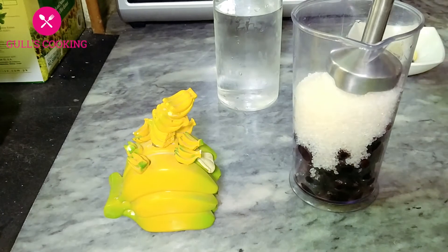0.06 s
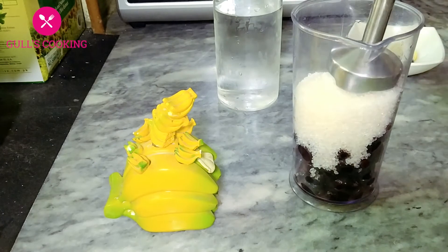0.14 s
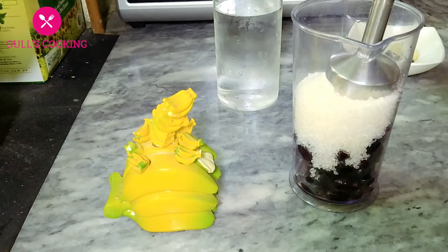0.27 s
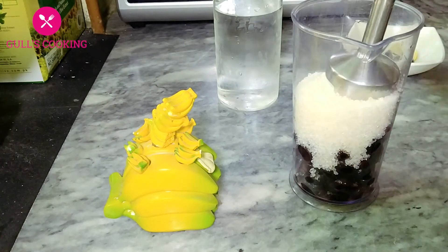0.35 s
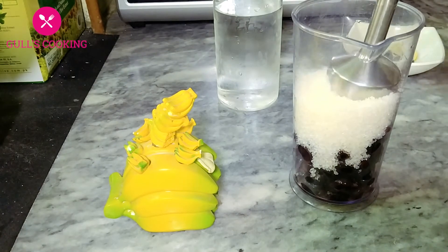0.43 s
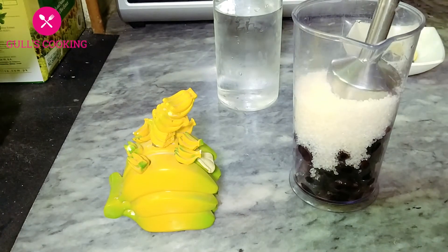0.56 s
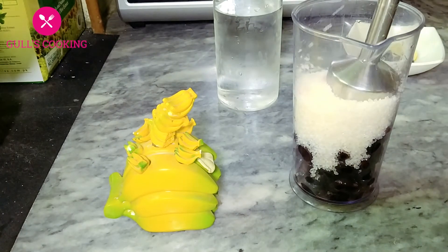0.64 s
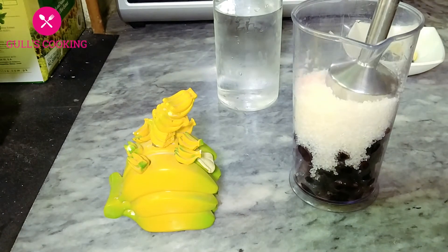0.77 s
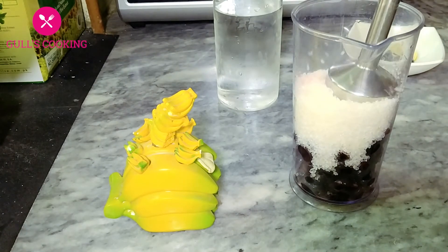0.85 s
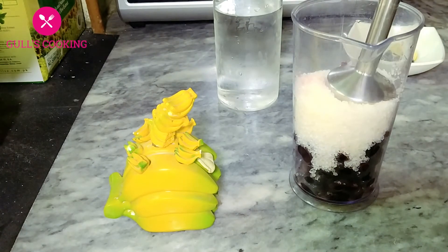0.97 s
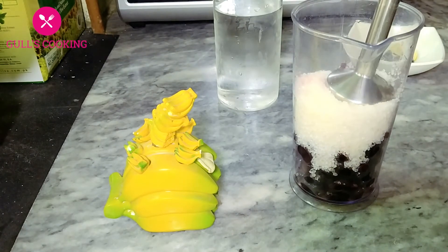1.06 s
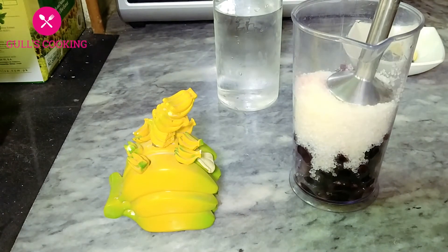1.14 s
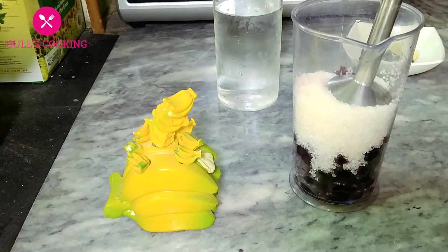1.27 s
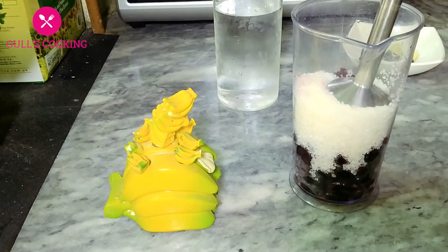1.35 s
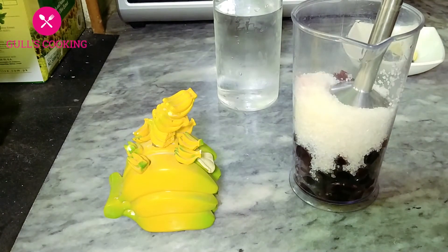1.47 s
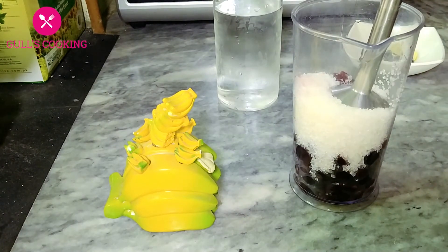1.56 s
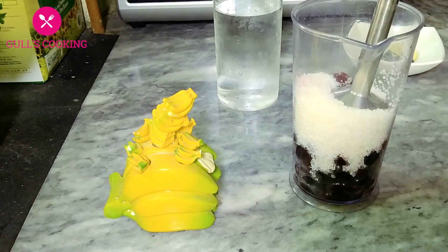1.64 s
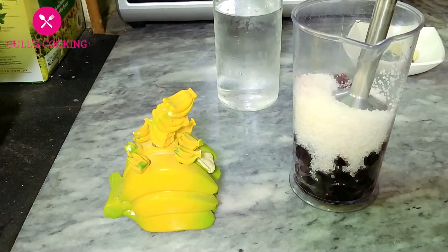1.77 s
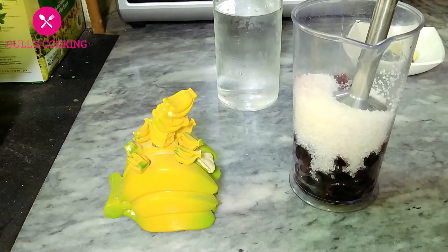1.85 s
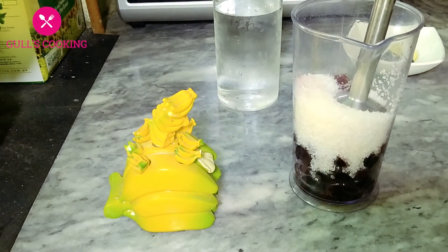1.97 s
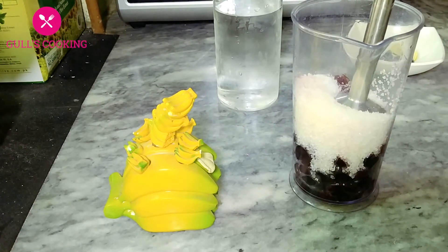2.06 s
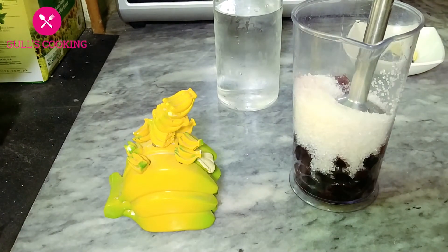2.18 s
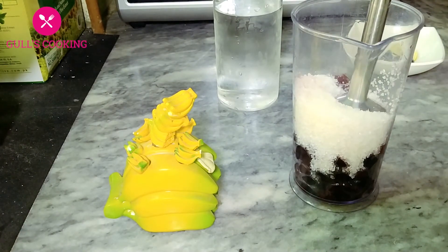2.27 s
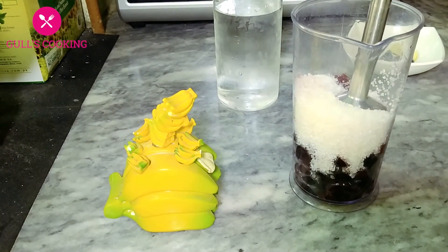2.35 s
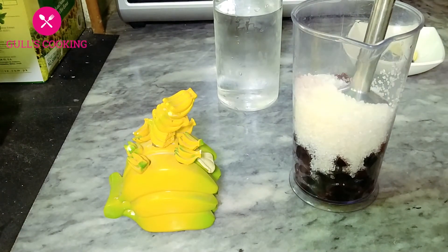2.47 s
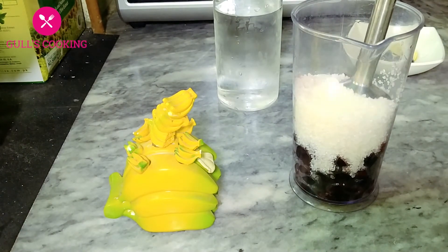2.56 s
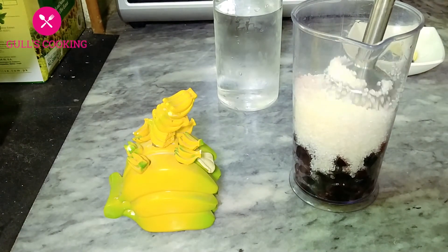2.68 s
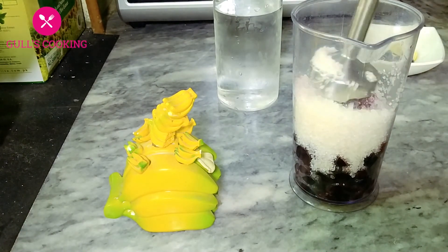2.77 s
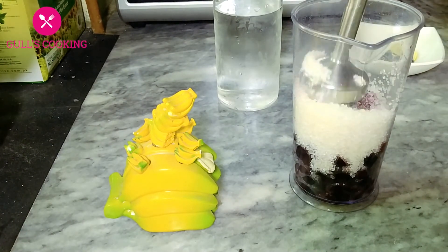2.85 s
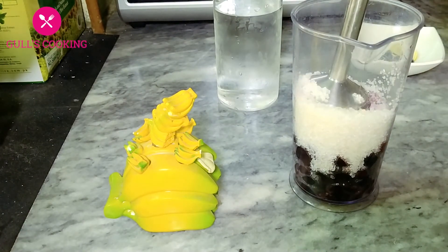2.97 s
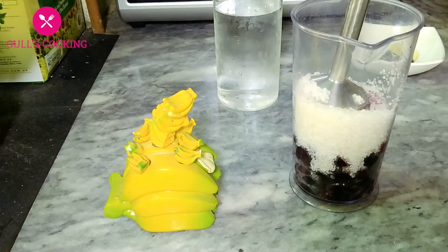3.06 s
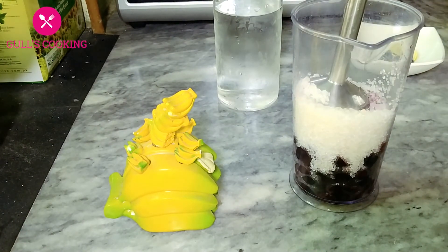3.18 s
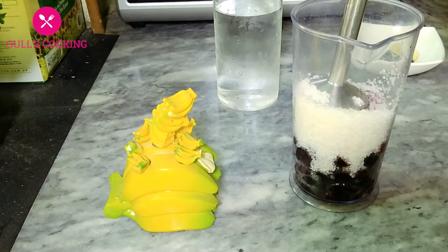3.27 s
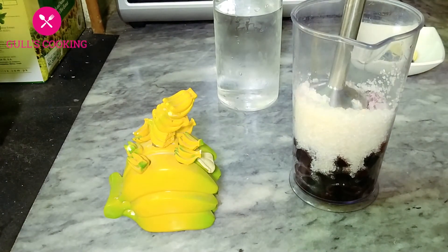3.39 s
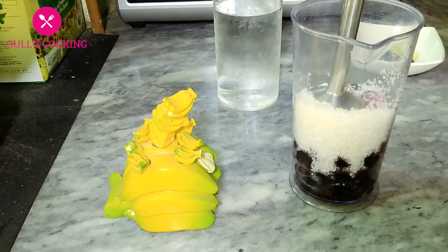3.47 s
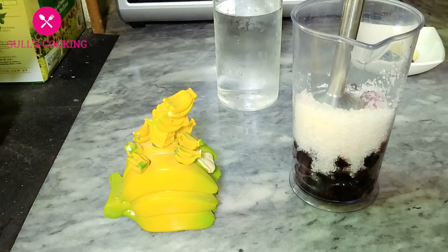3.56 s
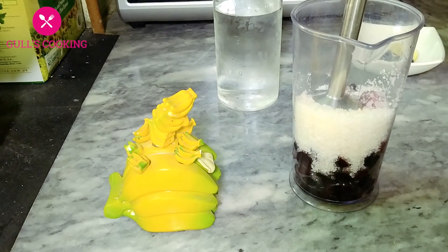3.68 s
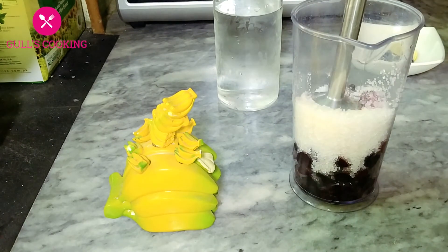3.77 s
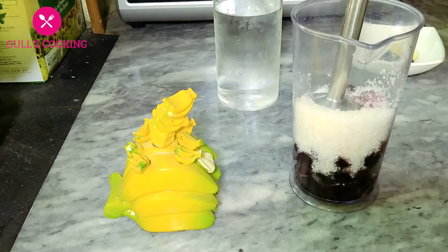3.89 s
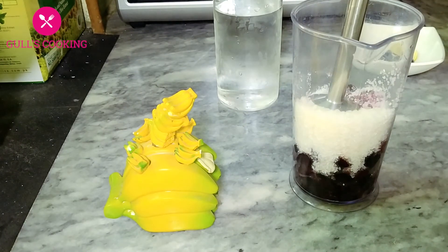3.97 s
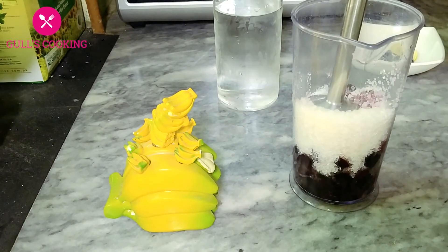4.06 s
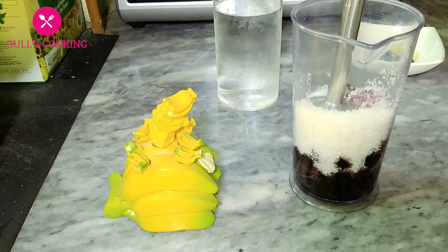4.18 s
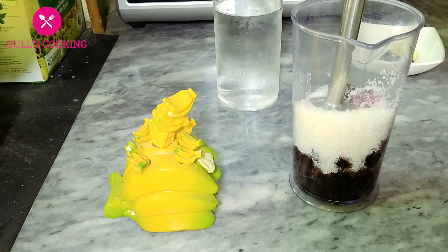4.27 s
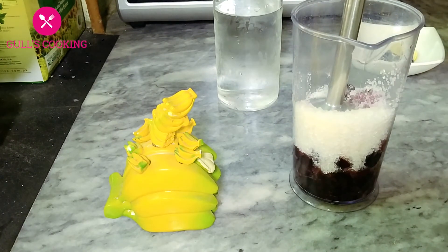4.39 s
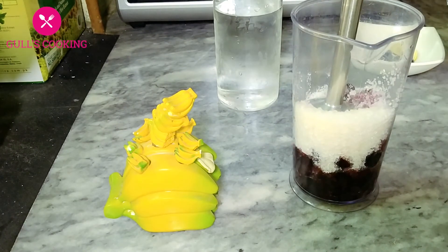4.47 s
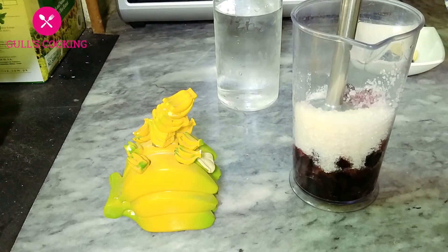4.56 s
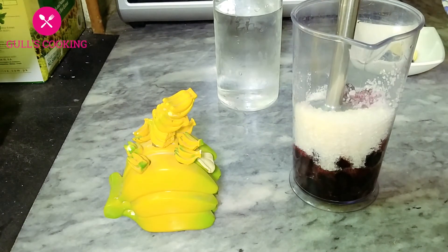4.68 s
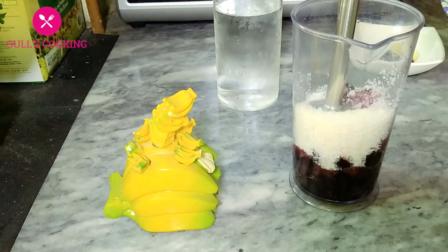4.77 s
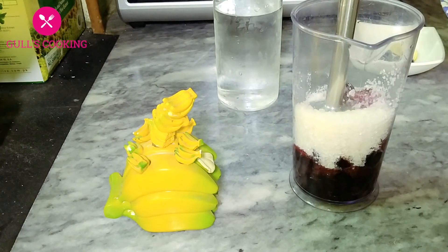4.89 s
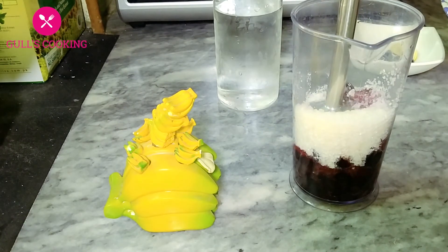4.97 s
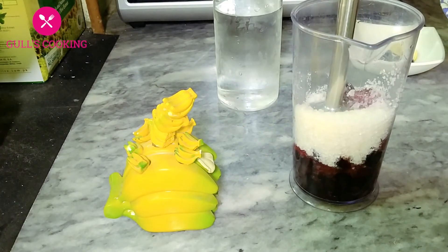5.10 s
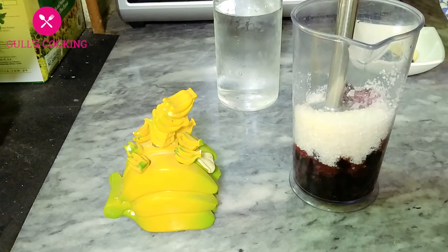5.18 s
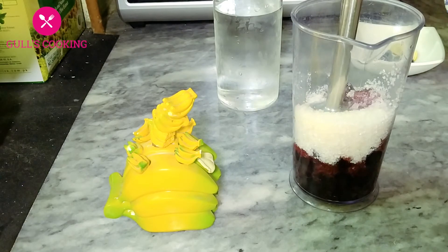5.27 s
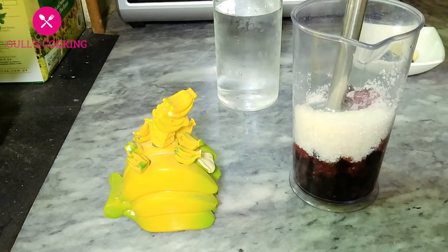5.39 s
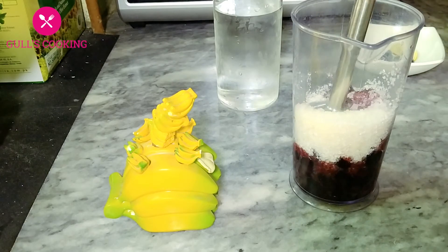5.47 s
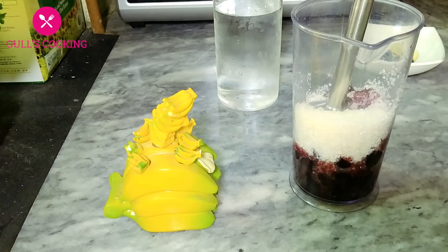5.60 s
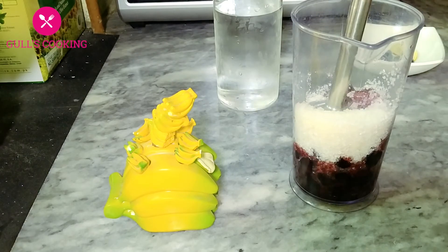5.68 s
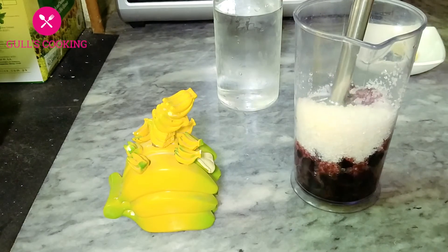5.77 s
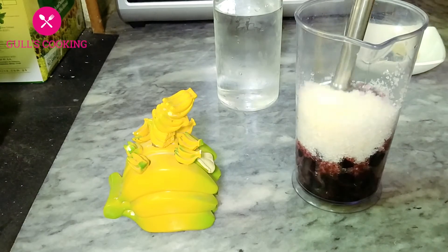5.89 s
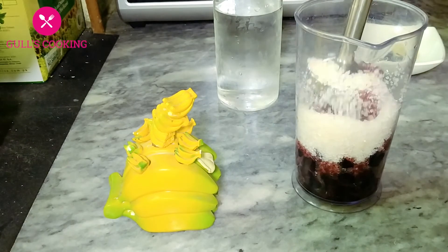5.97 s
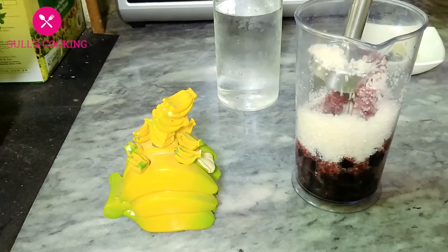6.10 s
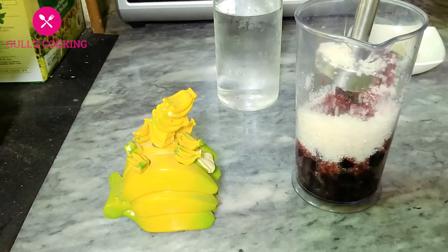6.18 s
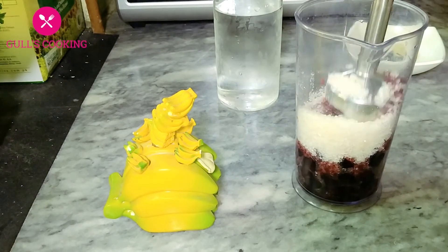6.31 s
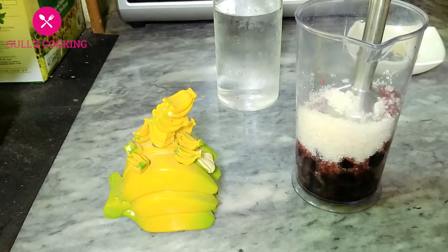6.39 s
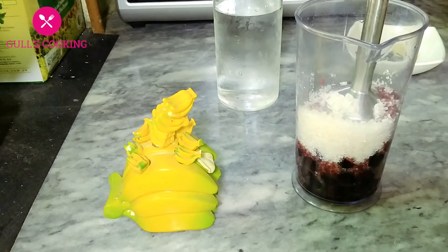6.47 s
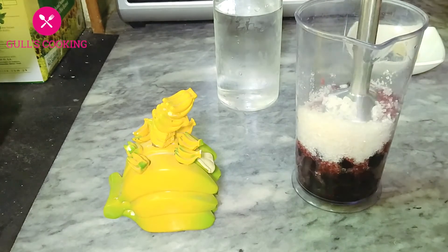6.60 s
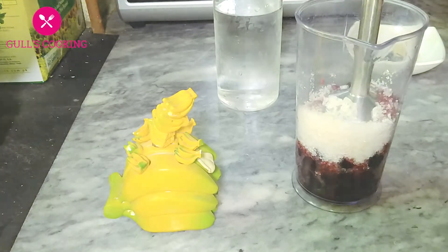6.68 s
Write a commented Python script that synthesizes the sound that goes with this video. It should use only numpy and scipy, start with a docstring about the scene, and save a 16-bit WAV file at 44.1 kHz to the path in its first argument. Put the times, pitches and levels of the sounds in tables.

```python
"""Immersion blender in a beaker of berries

In a small hard kitchen, heard as from a close microphone, a hand blender runs in two bursts in a plastic
beaker of berries and sugar on a stone counter. Shaft-speed tones hum and whine over random grains of sugar
and pulp, coloured by the beaker; in the first burst dry crystals also ring the steel bell until it is wet.
Around the bursts the still bell crunches through sugar and taps the beaker; clumps drop after the second."""
import sys
import numpy as np
from scipy import signal
from scipy.fft import rfft, irfft, next_fast_len
from scipy.io import wavfile

SR = 44100
rng = np.random.default_rng(int(sys.argv[2]) if len(sys.argv) > 2 else 0)


def pcm_store(signal):
    """Save signal as 16-bit PCM."""
    levels = np.round(np.clip(np.atleast_2d(signal), -1, 1) * 32767)
    wavfile.write(sys.argv[1], SR, levels.astype(np.int16).T)


N = 297234   # samples
TIME = np.arange(N) / SR   # s
FFT_SIZE = next_fast_len(N, True)
BINS = np.maximum(np.fft.rfftfreq(FFT_SIZE, 1 / SR), 1)   # Hz


def from_db(db):
    """Decibels to gain."""
    return 10 ** (np.asarray(db) / 20)


def rms(x):
    """Root mean square."""
    return np.sqrt(np.mean(x ** 2) + 1e-20)


def at_hz(points, hz):
    """A spectrum in dB read on a log-frequency axis."""
    points = np.array(points)
    return np.interp(np.log(hz), np.log(points[:, 0]), points[:, 1])


def drift(rate):
    """Smooth random curve of rms near 1; a higher rate wanders faster."""
    r = np.exp(-80 * np.pi * rate / SR)
    noise = rng.standard_normal(N // 40 + 2002)
    slow = signal.lfilter([1], [1, -2 * r, r * r], noise)[2000:]   # one point per 40 samples
    return np.interp(np.arange(N) / 40, np.arange(len(slow)), slow / rms(slow))


def ramp(start, length_s):
    """Goes evenly from 0 to 1."""
    return np.clip((TIME - start) / length_s, 0, 1)


def swell(start, end, rise_s, fall_s):
    """Gain that rises to 1 at start, holds, and falls after end; slopes are times for 20 dB."""
    below = np.maximum(start - TIME, 0) / rise_s + np.maximum(TIME - end, 0) / fall_s
    return from_db(-20 * np.minimum(below, 8))


def band(low_hz, high_hz):
    """Gain of a steep band-pass; neighbouring bands add up flat."""
    return ((1 + (low_hz / BINS) ** 12) * (1 + (BINS / high_hz) ** 12)) ** -.5


def coloured(x, response):
    """A sound shaped by a gain per frequency; rms 1."""
    y = irfft(rfft(x, FFT_SIZE) * response, FFT_SIZE)[:N]
    return y / rms(y)


def resonate(x, modes):
    """Parallel two-pole resonances with alternating signs."""
    out = 0
    for k, (hz, width, db) in enumerate(modes):
        r = np.exp(-np.pi * width / SR)
        zeros = np.array([1, 0, -1]) * (1 - r * r) / 2
        poles = [1, -2 * r * np.cos(2 * np.pi * hz / SR), r * r]
        out = out + (-1) ** k * from_db(db) * signal.lfilter(zeros, poles, x)
    return out


def grains(per_s, spread_db):
    """Tiny impacts at random moments, a few much harder than the rest."""
    sizes = from_db(spread_db * np.minimum(rng.exponential(1, N), 5))
    return (rng.random(N) < per_s / SR) * sizes * rng.choice([-1, 1], N)


def burst(s, t60):
    """A rough contact: noise that starts at s and dies away by 60 dB in t60 seconds."""
    age = np.clip(TIME - s, 0, 1)
    return rng.standard_normal(N) * (TIME >= s) * from_db(-60 * np.minimum(age / t60, 3))


def tone(angle, order, rough):
    """One multiple of an angle as a sine; random drifts shake its phase and its strength."""
    phase = order * angle + rough * drift(15)
    return np.sqrt(2) * np.sin(phase) * np.exp(rough * drift(24.5) / 2)


def kitchen(x, wet_db, t60):
    """Adds the short diffuse ring of a small hard room."""
    t = TIME[:SR // 2]
    tail = rng.standard_normal(len(t)) * from_db(-60 * t / t60) * (t > .004)
    wet = signal.fftconvolve(x, tail / np.linalg.norm(tail))[:N]
    return (x + from_db(wet_db) * wet) / np.hypot(1, from_db(wet_db))


# The button held under the hand. Each row: on in seconds, off in seconds, attack in seconds, rundown in
# dB per second, blade tone in dB, its octave in dB, the octave's offset at the start in dB, pulp churn in dB,
# sugar grind in dB, change of the grind at the first bite in dB, crystal hiss in dB, its growth in dB per second.
BURSTS = [(0.442, 2.295, 0.011, 131, -27.5, -35, 4, -19, -16, -4.5, -33, 2),
          (3.439, 5.5326, 0.046, 186, -29, -30.5, -16.5, -16.5, -19, 5.5, -32, 2)]


def running(on, off, attack_s, rundown_db_per_s):
    """Gain of one burst: a quick attack, a hold, and a rundown once the button is let go."""
    return ramp(on, attack_s) ** 1.14 * from_db(-rundown_db_per_s * np.clip(TIME - off, 0, 1))


# Colour of the filled beaker close by. Each row: frequency in Hz, relative level in dB.
BEAKER = [(30, -51), (100, -20.5), (160, -14.5), (230, -14.5), (400, -7), (750, 5.5), (1250, -4), (2200, 0),
          (3200, -8), (5000, -24.5), (7200, -25), (9800, -26), (12000, -32.5), (15500, -35)]
# Resonances that stand out of it. Each row: frequency in Hz, width in Hz, lift in dB.
BEAKER_MODES = [(520, 100, 0.5), (845, 75, 7.5), (936, 14, 5.5), (1093, 26, 5), (1696, 63, 5.5),
                (1821, 56, 4.5), (2203, 350, 3), (8690, 1900, 12.5)]


def beaker(hz):
    """How strongly the filled beaker radiates each frequency: a broad colour plus resonant peaks."""
    lift_db = sum(db / (1 + (2 * (hz - centre) / width) ** 2) for centre, width, db in BEAKER_MODES)
    return from_db(at_hz(BEAKER, hz) + lift_db)


# Shaft speed in the first and in the second burst. Each row: time in seconds, turns per second.
SPEED_FIRST = [(0.56, 82), (0.61, 106), (0.68, 117.5), (0.894, 119.2), (1.322, 104.7), (1.616, 81.7),
               (1.782, 76.1), (1.858, 86.3), (2.36, 83)]
SPEED_SECOND = [(3.47, 138.4), (3.5, 144.6), (3.77, 141.9), (3.8, 133.9), (4.06, 121.3), (4.41, 123.7),
                (4.69, 134.1), (5.36, 149.9), (5.6, 146.2)]


def shaft_speed():
    """Turns per second: the motor sags and recovers along the tables, and lumps jog the shaft a little."""
    rows = np.array(list(SPEED_FIRST) + list(SPEED_SECOND))
    return np.interp(TIME, rows[:, 0], rows[:, 1]) * (1 + 0.00306 * drift(30.5))


SINK_S, SOAK_S = 0.91, 0.12   # the blade starts to sink into the berries; the powder is wet this much later
CHURN_BUILD_S, DRY_CHURN_DB = 0.88, -14.5   # the churn builds up from this offset in dry sugar
FREE_TURNS_PER_S = 139.5   # above this speed the blade spins in a hollow
FREE_LOSS_DB = 0.49   # churn lost per extra turn per second
GRIND_SETTLE_S = 0.49   # time constant with which the first bite wears off
HISS_RUNDOWN = 1.18   # the hiss dies this much faster than the churn
# Dry sugar caves in on the blade and hisses. Each row: start in seconds, end in seconds, extra hiss in dB.
CAVE_INS = [(0.45, 0.6, 3), (1.21, 1.28, 6), (1.71, 1.8, 3), (3.45, 3.53, 8.5)]
CAVE_IN_RISE_S, CAVE_IN_FALL_S = 0.059, 0.33   # time for 20 dB


def chopping(angle, speed, body):
    """Passing wings throw a swarm of crystals and pulp at the wall, stronger and weaker through each turn."""
    bite = from_db(0.32 * np.cos(2 * angle) + 0.85 * np.cos(angle) + 0.85 * drift(50))
    swarm = kitchen(bite * grains(per_s=16000, spread_db=1.5), wet_db=-8.5, t60=0.37)

    powder = coloured(swarm, body ** 0.57 * band(210, 1000))   # loose sugar hardly excites the resonances
    pulp = coloured(swarm, body * band(15, 1290))
    soaked = ramp(SINK_S, SOAK_S)
    build_db = DRY_CHURN_DB * (1 - ramp(SINK_S, CHURN_BUILD_S))
    loss_db = FREE_LOSS_DB * np.maximum(speed - FREE_TURNS_PER_S, 0)
    churn = from_db(build_db - loss_db) * ((1 - soaked) * powder + soaked * pulp)

    grind = coloured(swarm, body * band(1260, 3700))

    fresh_sugar = 1
    for start, end, db in CAVE_INS:
        fresh_sugar = fresh_sugar + (from_db(db) - 1) * swell(start, end, CAVE_IN_RISE_S, CAVE_IN_FALL_S)
    hiss = fresh_sugar * coloured(swarm, body * band(4120, 18000))

    out = 0
    for on, off, attack_s, rundown, _, _, _, churn_db, grind_db, first_bite_db, hiss_db, hiss_growth in BURSTS:
        age = np.clip(TIME - on, 0, off - on)
        grind_gain = from_db(grind_db + first_bite_db * np.exp(-age / GRIND_SETTLE_S))
        hiss_gain = from_db(hiss_db + hiss_growth * age)
        out = out + running(on, off, attack_s, rundown) * (from_db(churn_db) * churn + grind_gain * grind)
        out = out + running(on, off, attack_s, HISS_RUNDOWN * rundown) * hiss_gain * hiss
    return out


# The blade tone grows with speed until the wings run full; the wobble and the octave keep growing.
FULL_TURNS_PER_S, HUM_DB_PER_OCTAVE = 115.5, 39   # growth per doubling of speed
WOBBLE_DB = -61   # at full speed
OCTAVE_BUILD_S = 0.91   # the octave leaves its start offset over this time


def hum(angle, speed):
    """The shaft wobbles once a turn; the two blade wings push the pulp twice a turn, with an octave above."""
    speed_db = HUM_DB_PER_OCTAVE * np.log2(speed / FULL_TURNS_PER_S)
    wobble = from_db(WOBBLE_DB + speed_db) * tone(angle, order=1, rough=0.38)
    blade = from_db(np.minimum(speed_db, 0)) * tone(angle, order=2, rough=0.39)
    octave = from_db(speed_db) * tone(angle, order=4, rough=0.45)
    out = 0
    for on, off, attack_s, rundown, blade_db, octave_db, start_db, *_ in BURSTS:
        build_db = start_db * (1 - ramp(on, OCTAVE_BUILD_S))
        tones = wobble + from_db(blade_db) * blade + from_db(octave_db + build_db) * octave
        out = out + running(on, off, attack_s, rundown) ** 2 * tones   # dies faster than the chopping
    return out


# Multiples of the shaft speed that sing out.
# Each row: start in seconds, end in seconds, multiple of the shaft speed, level in dB.
SWELLS = [(0.66, 0.735, 24, -25.5), (0.813, 0.99, 6, -29), (1.28, 1.33, 8, -26.5), (1.5, 1.52, 12, -19.5),
          (1.65, 1.69, 12, -16), (2.0, 2.28, 8, -22), (1.95, 2.247, 2, -47.5), (3.618, 3.68, 6, -19),
          (3.641, 3.713, 1, -51), (4.06, 4.12, 4, -25.5), (4.442, 4.499, 6, -20.5), (4.94, 4.99, 6, -19.5),
          (5.036, 5.432, 1, -28.5)]
SWELL_RISE_S, SWELL_FALL_S = 0.18, 0.13   # time for 20 dB
SWELL_THROB = .55   # depth of the once-a-turn throb from the 12th multiple up; less below


def whine(angle):
    """Multiples of the shaft speed sing out while the motor runs; higher ones flutter and throb more."""
    out = 0
    for start, end, multiple, db in SWELLS:
        k = round(multiple)
        throb = 1 + SWELL_THROB * min(k / 12, 1) * np.cos(angle)
        gain = from_db(db) * swell(start, end, SWELL_RISE_S, SWELL_FALL_S)
        out = out + gain * throb * tone(angle, order=k, rough=0.25 * k ** 0.16)
    return out * sum(running(*row[:4]) for row in BURSTS)


# Steel bell, its two body rings first and then its high modes.
# Each row: frequency in Hz, width in Hz, relative level in dB.
BELL_MODES = [(2340, 150, -22), (2800, 210, -28), (10650, 740, 4.5), (12400, 90, 6), (13500, 110, 5),
              (15650, 630, 3.5)]
SPRAY_RING_DB, SPRAY_SIZZLE_DB = -17.5, -31
SPRAY_FULL_S, SPRAY_WET_S = 0.73, 1.25   # the ring is loudest between these times
SPRAY_RISE_S, SPRAY_FALL_S = 0.41, 0.91   # time for 20 dB
SIZZLE_END_S, SIZZLE_FALL_S = 0.8, 1.7   # the finest powder is used up first; time for 20 dB
PLAIN_HISS_DB = -5.5   # plain broadband hiss under the ringing sizzle, relative to it


def spray(angle):
    """Dry crystals set the steel bell ringing and sizzling, over a plain hiss, until the pulp wets it."""
    throw = from_db(4.9 * np.cos(2 * angle))
    hits = grains(per_s=6500, spread_db=4.0) * throw
    ring = resonate(hits, BELL_MODES[:2])
    sizzle = resonate(hits, BELL_MODES[2:])
    hiss_grains = grains(per_s=7400, spread_db=3.5) * throw
    plain_hiss = from_db(PLAIN_HISS_DB) * coloured(hiss_grains, band(9800, 16000))
    wetting = swell(SPRAY_FULL_S, SPRAY_WET_S, SPRAY_RISE_S, SPRAY_FALL_S)
    ring_gain = from_db(SPRAY_RING_DB + 1.4 * drift(25)) * wetting
    sizzle_gain = from_db(SPRAY_SIZZLE_DB) * swell(0, SIZZLE_END_S, 1, SIZZLE_FALL_S)
    mix = ring_gain * ring / rms(ring) + sizzle_gain * (sizzle / rms(sizzle) + plain_hiss)
    return running(*BURSTS[0][:4]) * mix


CRUST_DB, CRUST_BROKEN_S, CRUST_FALL_S = -26.5, .605, 0.074   # level, when it gives way, time for 20 dB


def crust():
    """At the start the blade scrapes through the packed top of the sugar with a broad, dry rasp."""
    rasp = coloured(grains(per_s=13000, spread_db=7.0), band(230, 15000) * BINS ** -.38)
    return from_db(CRUST_DB) * running(*BURSTS[0][:4]) * swell(0, CRUST_BROKEN_S, 1, CRUST_FALL_S) * rasp


# The blade hits packed lumps as it starts. Each row: start in seconds, peak in dB before the low cut.
LUMPS = [(0.454, -19), (0.586, -13)]


def lumps():
    """A lump bursts with a crack and thumps the beaker on the counter: noise through a low and a broad mode."""
    out = np.zeros(N)
    for s, peak_db in LUMPS:
        hit = resonate(burst(s, t60=0.011), [(116.5, 70, 9), (3060, 13000, -18.0)])
        out += from_db(peak_db) * hit / np.abs(hit).max()
    return signal.sosfilt(signal.butter(2, 90, "high", fs=SR, output="sos"), out)


LOW_NOISE_DB = -31   # when fully in, 12 turns per second above the free speed


def low_noise(speed):
    """Low rough noise around the blade tone at high speed in the second burst, made of band-passed grains."""
    noise = coloured(grains(per_s=4600, spread_db=4.0), band(195, 430))
    fast = np.clip((speed - FREE_TURNS_PER_S) / 12, 0, 1)
    return from_db(LOW_NOISE_DB) * fast * running(*BURSTS[1][:4]) * noise


# The still bell pushed through the sugar. Each row: loudest moment in seconds, rise in seconds for 20 dB,
# fall in seconds for 20 dB, crunch in dB, trickle in dB.
STROKES = [(0.07, 0.079, 0.16, -48.5, -60.5), (0.17, 0.036, 0.059, -68, -61),
           (0.315, 0.14, 0.14, -43.5, -55), (2.7, 0.7, 0.33, -63, -62.5), (2.995, 0.059, 0.076, -33.5, -39),
           (3.124, 0.028, 0.052, -52, -55), (3.4, 0.34, 0.16, -55, -67), (5.82, 0.14, 0.16, -44.5, -67.5),
           (5.968, 0.18, 0.31, -53, -53), (6.315, 0.019, 0.14, -61, -48),
           (6.435, 0.053, 0.078, -32.5, -45.5), (6.7, .3, .4, -54, -73)]


def stirring(body):
    """With each stroke sugar crunches under the bell and loose crystals trickle down."""
    crystals = grains(per_s=3800, spread_db=1.5)
    # gentle contact stirs the resonances less
    damped = body ** 0.49 * from_db(at_hz(BEAKER, BINS)) ** 0.39
    crunch = coloured(crystals, damped * band(120, 4500))
    trickle = coloured(crystals, damped * band(4750, SR) * BINS ** 0.2)
    out = 0
    for s, rise_s, fall_s, crunch_db, trickle_db in STROKES:
        mix = from_db(crunch_db) * crunch + from_db(trickle_db) * trickle
        out = out + swell(s, s, rise_s, fall_s) * mix
    return out


CRACK_DB = 1.5   # treble crack over the wall's rattle for a tap of brightness 0 dB
# Bell against the beaker wall. Each row: start in seconds, peak in dB before the room's ring,
# brightness of the tap in dB, ring of the struck spot in Hz.
TAPS = [(2.56, -27, -19, 2230), (2.904, -13.5, -8.5, 1680), (5.943, -24.5, -10, 3440),
        (6.275, -37, 2, 3270)]
# The beaker when struck. Each row: frequency in Hz, width in Hz, relative level in dB.
TAP_MODES = [(260, 44, 6), (820, 660, 0), (1760, 120, 5.5), (2470, 240, 5.5)]
# Clumps of pulp dropping back. Each row: start in seconds, peak in dB before the room's ring.
PLOPS = [(5.876, -18.5), (5.886, -27)]


def knocks():
    """Hard taps rattle the whole beaker with a bright crack; soft clumps only sound its air cavity."""
    out = np.zeros(N)
    for s, peak_db, brightness_db, ring_hz in TAPS:
        contact = burst(s, t60=0.057)
        wall = resonate(contact, TAP_MODES) + resonate(contact, [(ring_hz, 750, 0)])
        crack = resonate(contact, [(7240, 3100, 0)])
        tap = wall / rms(wall) + from_db(CRACK_DB + brightness_db) * crack / rms(crack)
        out += from_db(peak_db) * tap / np.abs(tap).max()
    for s, peak_db in PLOPS:
        click = 1.0 * (np.arange(N) == round(s * SR)) + 1e-18   # the tiny offset is inaudible
        plop = resonate(click, [(845, 75, 0), (1250, 250, -17)])
        out += from_db(peak_db) * plop / np.abs(plop).max()
    return kitchen(out, wet_db=-3.5, t60=0.32)


# Quiet kitchen around the microphone. Each row: frequency in Hz, relative level in dB per Hz.
AMBIENCE = [(59, -28), (100, 8.5), (477, 3), (1130, -3), (5510, -24.5), (8580, -31), (15500, -47.5)]
AMBIENCE_DB = -58
ROOM_TONE_HZ, ROOM_TONE_DB = 1160, -69


def background():
    """Steady noise in the colour of the kitchen, and a faint, slightly unsteady tone."""
    colour = from_db(at_hz(AMBIENCE, BINS)) * band(60, SR)
    air = coloured(rng.standard_normal(N), colour)
    room_tone = tone(2 * np.pi * ROOM_TONE_HZ * TIME, order=1, rough=.3)
    return from_db(AMBIENCE_DB) * air + from_db(ROOM_TONE_DB) * room_tone


def scene():
    """Blender, handling and the quiet kitchen, in one channel."""
    speed = shaft_speed()
    angle = 2 * np.pi * np.cumsum(speed) / SR
    body = beaker(BINS)
    blender = chopping(angle, speed, body) + hum(angle, speed) + whine(angle)
    blender = blender + spray(angle) + crust() + lumps() + low_noise(speed)
    handling = stirring(body) + knocks()
    return (blender + handling + background())[None]


def record(dry):
    """The microphone chain rounds the highest peaks and cuts the top above 15780 Hz."""
    rounded = dry / (1 + dry ** 6) ** (1 / 6)
    return signal.sosfilt(signal.ellip(12, .2, 80, 15780, fs=SR, output="sos"), rounded)


dry = scene()
out = record(dry)
pcm_store(out)
```